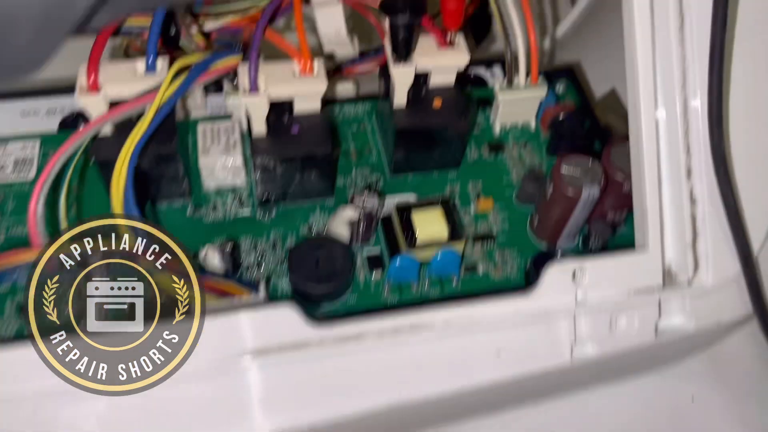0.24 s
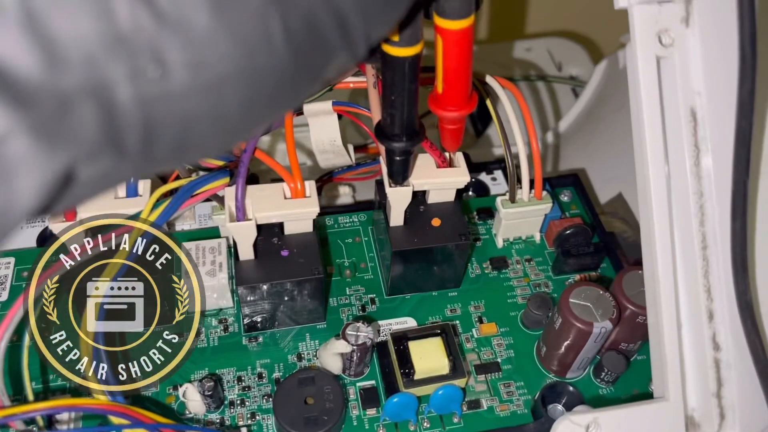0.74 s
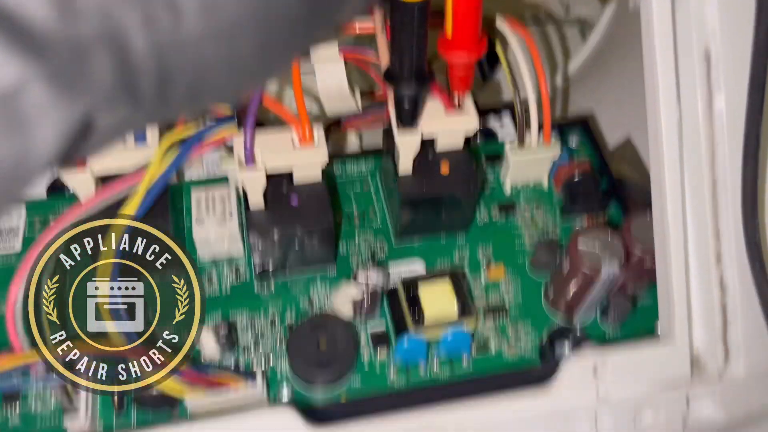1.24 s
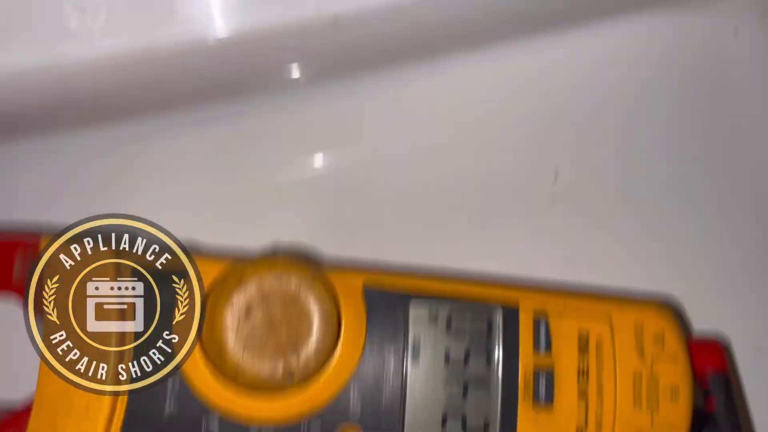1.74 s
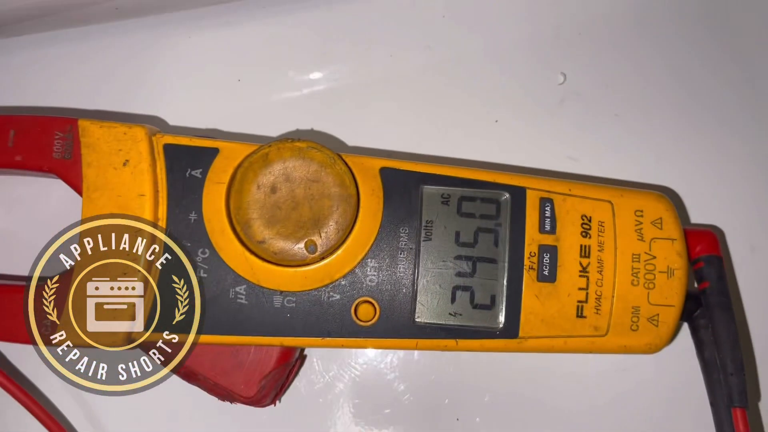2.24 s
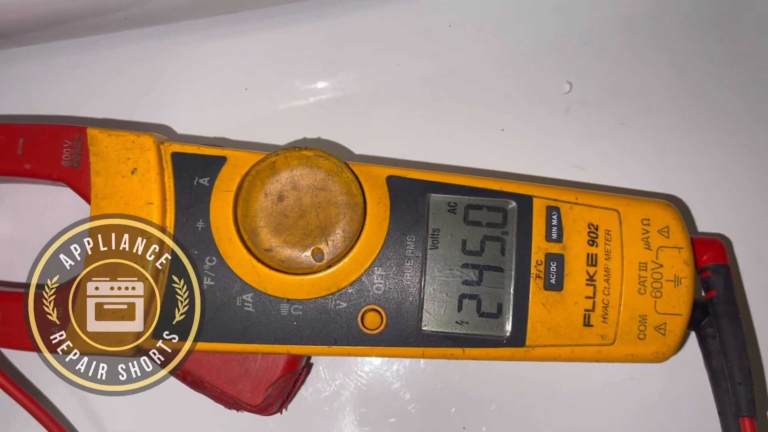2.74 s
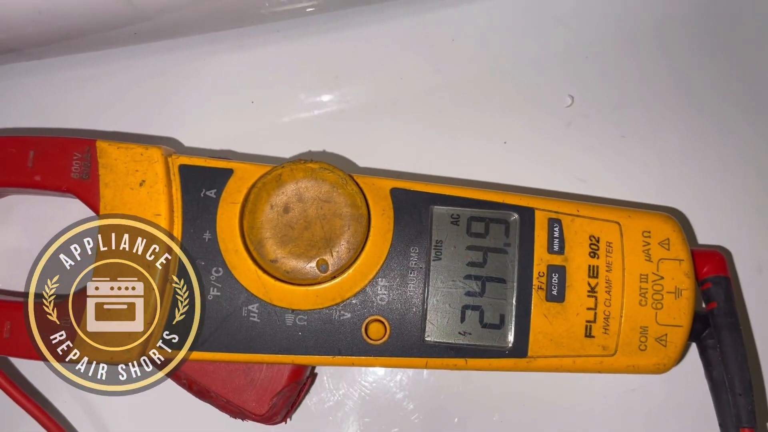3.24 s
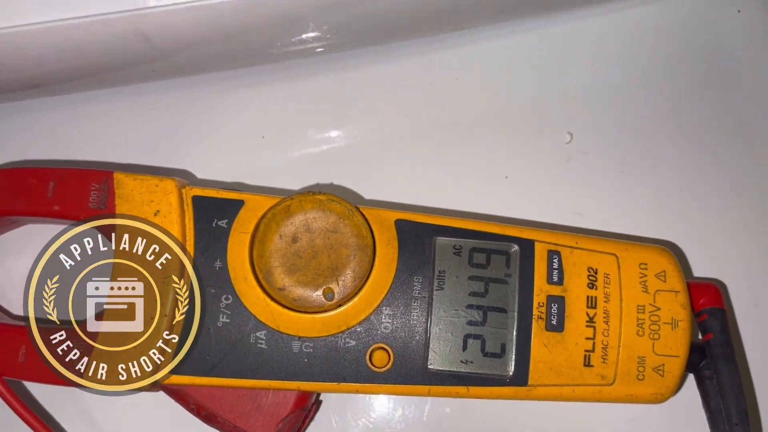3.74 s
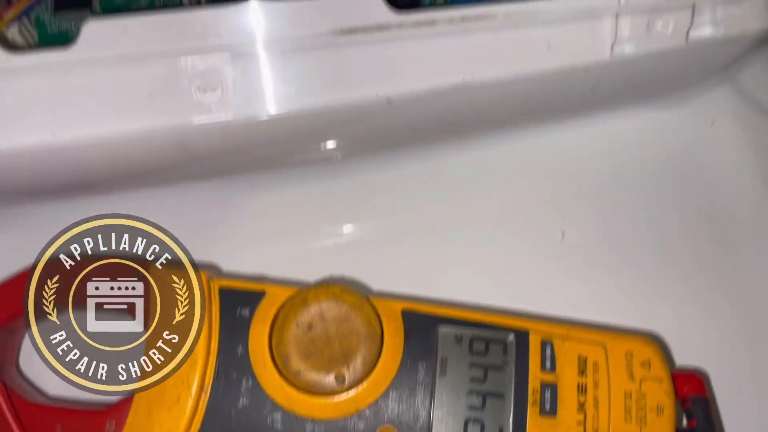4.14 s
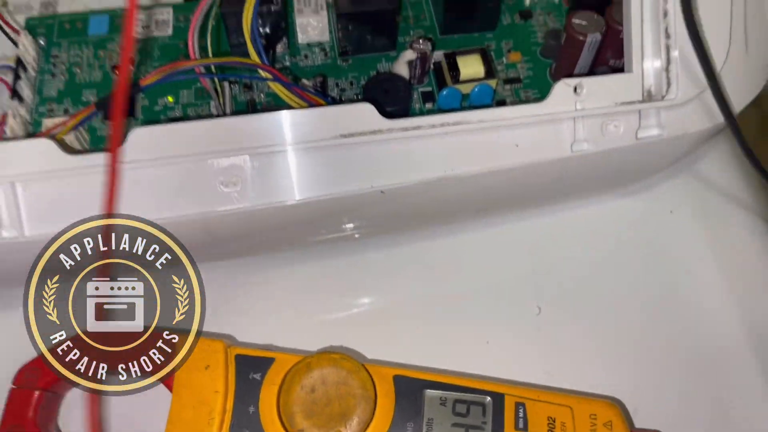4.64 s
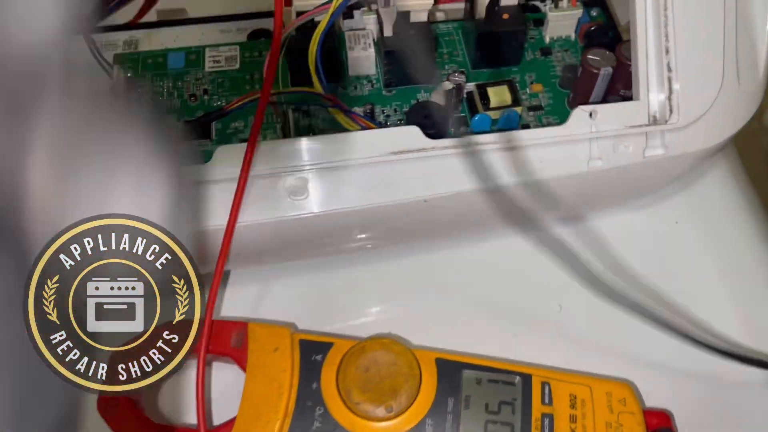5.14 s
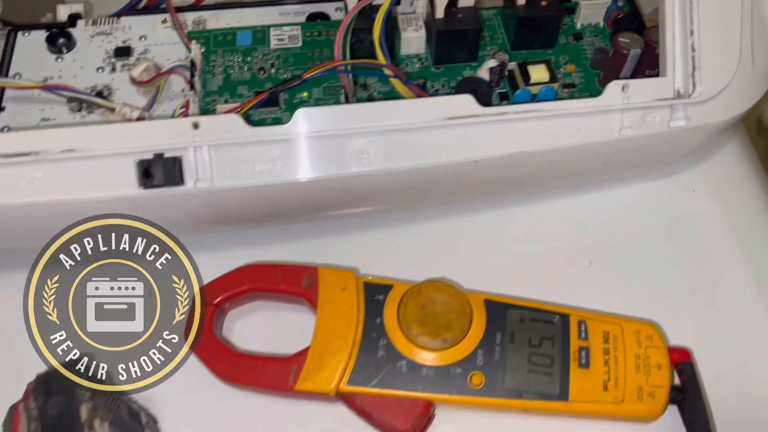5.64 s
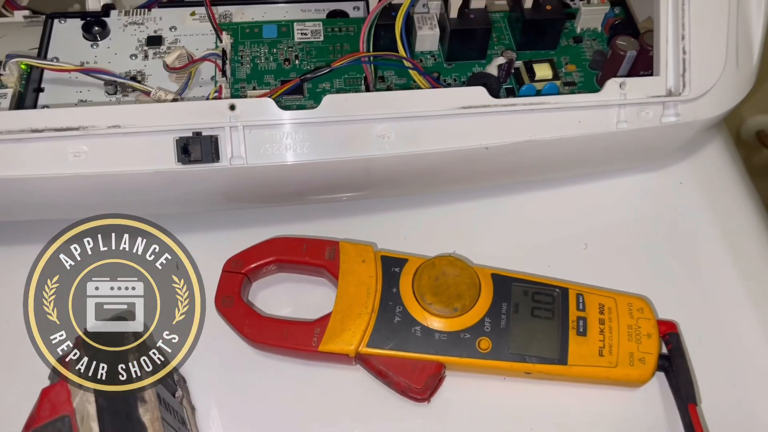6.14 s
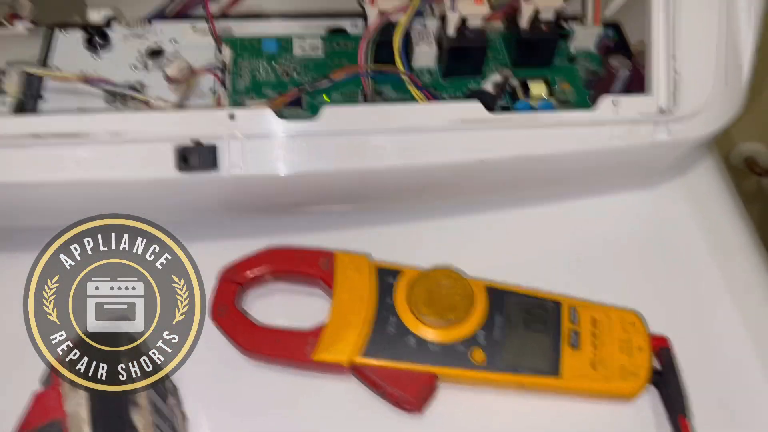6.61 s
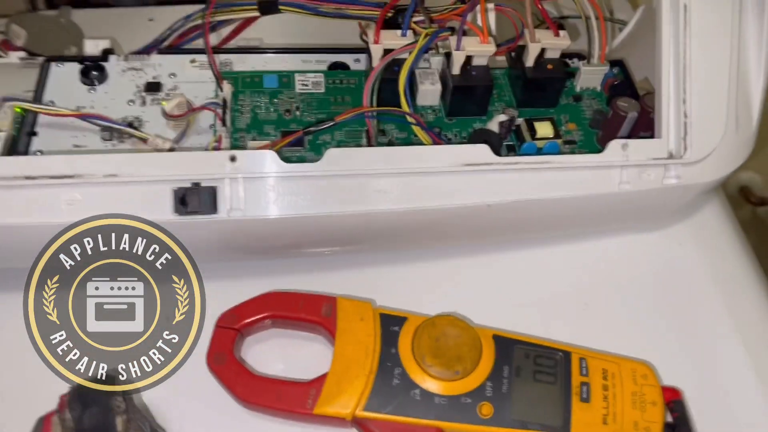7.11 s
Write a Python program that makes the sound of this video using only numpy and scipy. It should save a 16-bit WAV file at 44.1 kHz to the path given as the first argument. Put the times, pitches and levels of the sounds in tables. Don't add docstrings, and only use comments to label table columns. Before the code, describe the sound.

Close handheld pickup of a running clothes dryer, low mains hum and airy drum hiss, air buffeting, then plastic taps and a dragged lead.

```python
import sys
import numpy as np
from scipy import signal
from scipy.fft import rfft, irfft, next_fast_len
from scipy.io import wavfile
from scipy.ndimage import uniform_filter1d

SR = 44100
rng = np.random.default_rng(int(sys.argv[2]) if len(sys.argv) > 2 else 0)


def ratio_of_db(decibels):
    return 10 ** (np.asarray(decibels, float) / 20)


def bounce(signal):
    frames = np.transpose(np.atleast_2d(signal))
    limited = np.clip(frames, -1, 1)
    pcm = np.round(limited * 32767).astype(np.int16)
    wavfile.write(sys.argv[1], SR, pcm)


N = 325017

NEAR_DB = -35
DRUM_TURN_S = 1.214

# (time [s], base hum level [dB], how far the machine lies to one side [0-1])
POSE = [(0.0, -33.5, 0.22), (.5, -37, 0.03), (.95, -33.5, 0.03), (1.3, -35.5, 0), (1.5, -37, 0),
        (1.75, -33.5, 0), (2.4, -33.5, 0.01), (3.7, -34, 0), (4.2, -38, 0.5), (4.5, -36.5, 0.58),
        (4.8, -36.5, 0.1), (5.1, -38.5, 0.58), (5.6, -41.5, 0.68), (6.0, -39, 0.8), (6.3, -43.5, 0.72),
        (6.6, -40.5, 0.8), (7.0, -37.5, 0.49), (7.36, -37.5, 0.4)]
# (frequency [Hz], left lead [rad] and likeness [0-1] with the machine ahead,
# left lead [rad] and likeness [0-1] with it to one side)
PORTS = [(40, 0, 1, .7, .93), (150, 0, .998, .9, .9), (260, 0, .99, 1.6, .85), (420, .05, .94, 2.9, .75),
         (620, .15, .6, 3.4, .75), (800, -.3, .8, 4.2, .6), (1300, -.15, .85, 5.3, .5),
         (1900, .05, .94, 6.4, .8), (2800, 1.4, .4, 6.7, .35), (3900, 1.1, .45, 7.3, .45)]
# (time into the turn [s], level [dB], half width [s])
DRUM_RUB = [
    (1.205, -3, 0.097),
    (.14, 1, 0.029),
    (.29, -6, 0.049),
    (.48, 2, 0.016),
    (.64, 6.5, 0.0015),
    (.70, -5.5, 0.0091),
    (.84, -2, 0.012),
    (.96, 1.5, 0.085),
    (1.04, -1.5, 0.016),
]
# (time [s], level [dB], half width [s])
SHADE = [
    (1.3, -3, .03),
    (1.45, -2.5, .06),
    (4.2, -6, .05),
    (5.11, -4, .03),
    (6.26, -4, .025),
    (6.59, -6, .02),
    (6.71, -8, .035),
]


def evened(x):
    return x / np.sqrt(np.mean(np.abs(x) ** 2) + 1e-20)


def read(table, hz):
    f, *columns = np.transpose(table)
    return [np.interp(np.log(hz + 1), np.log(f + 1), c) for c in columns]


def curve(table, column, t):
    return np.interp(t, np.transpose(table)[0], np.transpose(table)[column])


def bumps(table, t, every_s=1e3):
    total = 0
    for s, db, width in table:
        apart = (t - s + every_s / 2) % every_s - every_s / 2
        total = total + db * np.exp(-.5 * (apart / width) ** 2)
    return total


def link(lead, likeness):
    return np.clip(likeness, 0, 1) * np.exp(1j * lead)


def pair(one, other, bond):
    unlike = np.sqrt(np.maximum(1 - np.abs(bond) ** 2, 0))
    return np.array([one, np.conj(bond) * one + unlike * other])


def port_table(hz):
    # (frequency [Hz], left lead [rad], likeness [0-1])
    treble_path = [(4400, 2.4, .7), (4750, 2.6, .75), (4900, 3.14, .96), (5050, 3.8, .78), (5400, 4.9, .8),
                   (5950, 6.28, .99), (7400, 7.8, .85), (8350, 9.0, .97), (9000, 9.42, .995),
                   (9650, 9.75, .98), (10600, 11.1, .92), (12000, 12.4, .98)]
    treble = [(f, lead, like, lead + 2 * np.pi, like) for f, lead, like in treble_path]
    return read(PORTS + treble, hz)


def machine_bond(hz, t):
    lead, like, side_lead, side_like = port_table(hz)
    aside = np.clip(curve(POSE, 2, t), 0, 1)
    return np.outer(link(lead, like), 1 - aside) + np.outer(link(side_lead, side_like), aside)


def airy(spectrum, level_db, bond_at, size, patchy_db, flicker_db):
    frames, hz = 4 * N // size + 5, np.fft.rfftfreq(size, 1 / SR)
    a, b, c, d, patches = rng.standard_normal((frames, len(hz), 5)).T
    patches = uniform_filter1d(patches, size=size // 100, axis=0)
    patches = evened(uniform_filter1d(patches, size=9, axis=1))
    flicker = evened(uniform_filter1d(rng.standard_normal(frames), size=5))
    z = pair(a + 1j * b, c + 1j * d, bond_at(hz, np.arange(frames) * size / 4 / SR))
    z = z * ratio_of_db(read(spectrum, hz)[0][:, None] + patchy_db * patches + flicker_db * flicker)
    sound = signal.istft(z, nperseg=size, noverlap=3 * size // 4)[1][:, :N]
    return evened(sound) * ratio_of_db(level_db)


def buffeting_db(t):
    # (time [s], buffeting level [dB])
    swings = [(0.0, -41.5), (.42, -43), (.55, -56.5), (1.2, -57), (1.28, -34), (1.54, -41.5), (1.65, -51),
              (2.3, -73), (3.8, -62), (3.88, -39), (4.0, -43.5), (4.2, -39), (4.35, -43), (5.0, -42.5),
              (5.9, -44.5), (6.45, -46), (6.6, -38.5), (7.37, -43)]
    # (time [s], level [dB], half width [s])
    gusts = [
        (.04, -1, 0.037),
        (4.55, 2, 0.05),
        (4.8, 1, 0.028),
        (5.15, 5, 0.027),
        (5.6, 15, 0.0092),
        (5.8, -0.5, 0.048),
        (6.26, 5.5, 0.059),
        (6.58, 3.5, 0.057),
        (6.71, -1, 0.053),
        (7.3, 1.5, 0.035),
    ]
    return curve(swings, 1, t) + bumps(gusts, t)


def swing(t):
    calm_db, full_db = -46, -36
    return np.clip((buffeting_db(t) - calm_db) / (full_db - calm_db), 0, 1.5)


def hum(waver_db=2.5):
    hum_hz, shaft_hz = 120.0, 29.2
    # (hum multiple, shaft multiple, level against the base [dB], left lead [rad])
    orders = [(0, 1, -34, .05), (0, 2, -13, .05), (1, -1, -18, .08), (2, -1, -30, 0), (2, 1, -18, -.3),
              (3, 0, -23.5, 0), (4, 1, -23, .85), (0, 19, -22.5, -.54), (5, 0, -24.5, -1.7),
              (5, 1, -29, .65)]
    # (multiple, level [dB], share of the base's change, gain in a full swing [dB], waver [dB])
    overtones = [(2, -40.3, .5, 2.0, .6), (4, -48.5, .5, -3.0, .8)]
    # (time [s], level [dB], half width [s])
    nodes_second = [
        (.75, -21, 0.045),
        (1.15, -7, 0.083),
        (2.0, -9, 0.028),
        (3.2, -38, 0.018),
        (3.52, -3.5, 0.12),
        (5.62, -3.5, 0.069),
        (5.95, -18, 0.022),
        (7.1, -7.5, 0.24),
    ]
    # (time [s], level [dB], half width [s])
    nodes_fourth = [
        (.75, 1.5, .25),
        (1.55, -3, 0.17),
        (2.9, -2, 0.065),
        (4.1, -3, 0.15),
        (4.75, 2.5, 0.81),
        (6.7, 6, .1),
        (7.1, 5, 0.049),
    ]
    # (time into the beat [s], level [dB], half width [s])
    beat, beat_s = [
        (.27, -11, .09),
        (.58, 3, .12),
    ], .625

    t = np.arange(N) / SR
    base, aside = curve(POSE, 1, t), curve(POSE, 2, t)
    lines = [(hum_hz, base, 0.8, .07)]
    for k, db, share, swing_db, waver in overtones:
        nodes = nodes_second if k == 2 else nodes_fourth
        level = db + share * (base - NEAR_DB) + swing_db * swing(t) + bumps(nodes, t)
        lines.append((round(k) * hum_hz, level, waver, 0))
    for m, s, db, own in orders:
        level = base + db
        if (m, s) == (0, 2):
            level = level + bumps(beat, t, beat_s)
        lines.append((m * hum_hz + s * shaft_hz, level, waver_db, own))

    out = np.zeros((2, N))
    for hz, db, waver, own in lines:
        start, slow = 2 * np.pi * rng.random(), rng.standard_normal(40)
        lead = (own + aside * (read(PORTS, hz)[2] - own)) * np.array([[.5], [-.5]])
        db = db + waver * np.interp(t, np.linspace(0, N / SR, len(slow)), slow)
        out += np.sqrt(2) * ratio_of_db(db) * np.sin(2 * np.pi * hz * t + start + lead)
    return out


def cabinet_rumble():
    # (frequency [Hz], density [dB per Hz])
    spectrum = [(22, -34), (36, -27), (52, 9), (70, -11.5), (100, 5.5), (150, -6.5), (210, -3.5),
                (265, 1.5), (315, -8.5), (410, -12), (560, -14), (900, -53)]
    panel_hz, panel_duck_db = 292, -3.5
    t = np.arange(N) / SR
    level = -37.5 + 0.23 * (curve(POSE, 1, t) - NEAR_DB) - 0.76 * swing(t)
    rumble = airy(spectrum, level, machine_bond, size=2048, patchy_db=-0.5, flicker_db=2.0)
    panels = signal.filtfilt(*signal.butter(2, panel_hz, "high", fs=SR), rumble)
    return rumble + panels * (ratio_of_db(panel_duck_db * swing(t) + 0.65 * bumps(SHADE, t)) - 1)


def blower_flow():
    # (frequency [Hz], density [dB per Hz])
    spectrum = [(250, -18), (400, -6), (600, -2), (720, 1), (880, 1), (1150, -5.5), (1350, -7), (1800, -19),
                (2600, -32)]
    # (time [s], level [dB], half width [s])
    over_panel = [
        (0.794, 2.5, 0.24),
    ]
    t = np.arange(N) / SR
    rub_db = bumps(DRUM_RUB, t, DRUM_TURN_S)
    level = -49 + 0.39 * (rub_db - rub_db.mean())
    level = level - 2.4 * np.maximum(buffeting_db(t) + 43.0, 0)
    level = level + bumps(SHADE + over_panel, t)
    return airy(spectrum, level, machine_bond, size=1024, patchy_db=2.0, flicker_db=1.24)


def drum_hiss():
    # (frequency [Hz], density [dB per Hz])
    spectrum = [(700, 2.5), (1300, 3), (1750, 1.5), (2350, 4.5), (3000, -1.5), (4000, -2), (4900, -2.5),
                (6500, -3), (8000, -1.5), (9000, -1), (10200, -.5), (11200, 1), (11750, -13), (12300, -23),
                (14000, -29)]
    t = np.arange(N) / SR
    level = -53 + bumps(DRUM_RUB, t, DRUM_TURN_S) + 0.3 * bumps(SHADE, t)
    return airy(spectrum, level, machine_bond, size=512, patchy_db=2.0, flicker_db=0.5)


def buffet_bond(hz, t):
    # (frequency [Hz], left lead [rad], likeness [0-1])
    push = [(61, 3.9, 0.22), (260, 2.85, 0.87), (352, 3.25, 1), (493, 3.48, 0.86), (797, 3.0, 0.86),
            (994, 3.14, 1), (1725, 4.37, 0.92), (2500, 3.5, 0.94)]
    return link(*read(push, hz))[:, None]


def moan_bond(hz, t):
    # (frequency [Hz], left lead [rad], likeness [0-1])
    boom = [(170, 2.7, .9), (250, 1.27, 0.86), (340, 2, 0.68)]
    return link(*read(boom, hz))[:, None]


def buffeting():
    # (frequency [Hz], density [dB per Hz])
    gust_spectrum = [(30, -30), (90, 0), (150, -1), (270, 0.5), (400, 1.5), (600, -4.5), (900, -7),
                     (1300, -14.5), (2000, -26.5), (4000, -40), (7000, -63)]
    # (frequency [Hz], density [dB per Hz])
    moan_spectrum = [(170, -39), (225, -24), (250, 17), (280, -14), (340, -40), (600, -80)]
    level = buffeting_db(np.arange(N) / SR)
    gusting = airy(gust_spectrum, level + 3.0, buffet_bond, size=1024, patchy_db=4.0, flicker_db=3.5)
    moan = airy(moan_spectrum, level - 2.5, moan_bond, size=2048, patchy_db=3.0, flicker_db=5.0)
    return gusting + moan


def touches():
    # (time [s], level [dB], centre [Hz], width [octaves], t60 [s])
    taps = [(4.334, -38.5, 2500, 0.48, 0.055), (4.335, -44, 6500, 1.2, 0.05), (4.454, -61, 1000, 1.2, .014),
            (4.482, -48, 7800, 0.49, 0.03), (4.719, -51, 5800, 2.1, 0.16), (4.8422, -34, 6600, 0.83, 0.008),
            (4.8422, -32, 2500, 7.3, 0.0083), (5.397, -46, 1500, 0.62, 0.09), (5.396, -47, 4970, 0.26, .03),
            (5.485, -46, 2030, 0.96, 0.03), (5.968, -44, 2760, 2.1, 0.2), (6.331, -54.5, 3000, 2.3, 0.39)]
    # (time [s], level [dB], centre [Hz], width [octaves], contact [s])
    brushes = [(4.269, -47, 2630, 0.16, 0.014), (4.272, -42, 7650, 0.65, 0.012),
               (4.276, -50, 1660, 0.12, 0.012), (4.277, -36, 11000, 0.18, 0.0084),
               (4.279, -50, 5550, 0.31, 0.01), (4.31, -48.5, 7000, 1.3, 0.024),
               (4.585, -57, 5500, 1.2, 0.024), (5.139, -52, 6400, 1.8, 0.031),
               (5.298, -48.5, 3000, 2.3, 0.024), (6.119, -49.5, 1410, 1.65, 0.024),
               (6.409, -47, 1027, 0.68, 0.037), (6.515, -50.5, 3540, 2.1, 0.016),
               (6.689, -52.5, 4000, 3.7, 0.025), (6.942, -56, 6140, 2.3, 0.046),
               (7.141, -50, 1810, 1, 0.02)]
    # (time [s], level [dB], pitch [Hz], contact [s])
    sings = [(4.275, -50, 7290, .012), (4.277, -49, 6150, .015), (4.276, -45, 11400, .012),
             (4.287, -49, 5600, .008), (5.514, -45, 1910, .012), (5.515, -52, 5780, .012),
             (5.516, -44, 3370, .012), (5.518, -45, 2980, .014), (5.543, -43, 2120, .02),
             (5.548, -50, 4140, .015), (5.55, -52, 5520, .015), (5.552, -42, 1200, .022),
             (5.584, -43, 2340, .025), (5.586, -44, 1990, .02), (5.592, -43, 1390, .025),
             (5.595, -41, 807, .03), (5.6, -44, 1170, .02), (5.615, -45, 1100, .015),
             (5.551, -52, 11500, .008)]
    tap_s, sing_width_hz, sing_t60_s = .0022, 110, 0.026
    rise_share = 0.33

    t, hz = np.arange(8192) / SR, np.fft.rfftfreq(8192, 1 / SR)
    rows = [(s, db, f, octaves, tap_s, tap_s, t60) for s, db, f, octaves, t60 in taps]
    for s, db, f, octaves, contact in brushes:
        t60 = 14.4 * contact * (3000 / f) ** 0.48
        rows.append((s, db, f, octaves, contact, rise_share * contact, t60))
    for s, db, f, contact in sings:
        rows.append((s, db, f, sing_width_hz / f, contact, rise_share * contact, sing_t60_s))

    out = np.zeros((2, N + 8192))
    for s, db, centre_hz, octaves, contact, rise, t60 in rows:
        colour = np.exp(-.5 * (2 * np.log2((hz + 1) / centre_hz) / octaves) ** 2)
        puff = evened(irfft(rfft(rng.standard_normal((2, len(t)))) * colour))
        shape = np.minimum(t / rise, 1) * ratio_of_db(-60 * np.maximum(t - contact, 0) / t60)
        out[:, round(s * SR):][:, :len(t)] += ratio_of_db(db) * puff * shape
    return out[:, :N]


def lid(x, ring_db):
    # (frequency [Hz], width [Hz], level [dB])
    modes = [(845, 74, 15), (1143, 48, 13.5), (1435, 290, 13.5), (2100, 250, 14), (2310, 21, -5),
             (3320, 24, -4), (4500, 9.5, -17), (5500, 59, 4)]
    t = np.arange(2048) / SR
    ring = sum(ratio_of_db(db) * np.exp(-np.pi * width * t) * np.sin(2 * np.pi * hz * t) for hz, width, db in modes)
    ring = ring[None] / np.linalg.norm(ring)
    return x + ratio_of_db(ring_db) * signal.oaconvolve(x, ring)[:, :x.shape[1]]


def clicks(table, low_hz):
    out = np.zeros((1, N))
    for s, db, edge_hz in table:
        band = signal.butter(2, [low_hz, edge_hz], "band", fs=SR)
        click = signal.lfilter(*band, signal.unit_impulse(256))
        out[0, round(s * SR):][:256] += ratio_of_db(db) * click / abs(click).max()
    return out


def tip_ticks():
    # (time [s], peak [dB], brightness edge [Hz])
    ticks = [
        (4.3143, -40, 5000),
        (4.3311, -23, 10000),
        (4.844, -31, 7000),
        (5.3955, -32, 4000),
        (5.4852, -40, 3000),
        (5.865, -38, 4020),
        (5.9695, -31, 7000),
        (6.24, -47, 4000),
        (6.3335, -35, 4900),
    ]
    return lid(clicks(ticks, low_hz=1000), ring_db=-2.0)


def pings(rise_s=0.001):
    # (time [s], peak [dB], pitch [Hz], t60 [s])
    rings = [(4.3300, -29, 2740, .017), (4.8420, -33, 5750, .008), (4.8425, -35, 1550, .012),
             (4.8434, -14.5, 8900, .005), (4.8435, -36, 860, .015), (5.3955, -35, 1500, .022),
             (4.7215, -42, 5750, .02), (5.4852, -35, 1800, .012), (5.9715, -44, 2950, .02),
             (5.969, -47, 3900, .02), (5.969, -49, 7200, .015), (5.969, -49, 5300, .02),
             (6.333, -48, 3900, .02), (6.333, -48, 2900, .02), (6.333, -44, 1400, .02)]
    out, t = np.zeros((1, N)), np.arange(4096) / SR
    for s, db, hz, t60 in rings:
        shape = np.minimum(t / rise_s, 1) * ratio_of_db(db - 60 * t / t60)
        out[0, round(s * SR):][:len(t)] += shape * np.sin(2 * np.pi * hz * t)
    return out


def grip():
    # (time [s], peak [dB], brightness edge [Hz])
    shifts = [
        (4.4072, -33, 4000),
        (4.4402, -39, 2500),
        (4.4545, -31, 1300),
    ]
    return clicks(shifts, low_hz=505) * np.array([[1], [-1]])


def clip_snap():
    # (time [s], peak [dB], brightness edge [Hz])
    snaps = [
        (4.8423, -27, 9000),
        (4.8429, -27, 10000),
        (4.844, -18, 11500),
        (4.8451, -23, 11000),
    ]
    return clicks(snaps, low_hz=7000)


def drag(slips_per_s=1200, spread_db=2.5, low_hz=450):
    # (time [s], level [dB])
    jerks = [(5.5125, -46), (5.516, -33), (5.524, -36), (5.535, -37), (5.553, -32.5), (5.58, -35),
             (5.597, -32.5), (5.612, -35), (5.628, -38), (5.638, -42), (5.66, -47), (5.7, -48)]
    t = np.arange(jerks[0][0], jerks[-1][0], 1 / SR)
    slips = rng.standard_normal((2, len(t))) * (0.35 + (rng.random(len(t)) < slips_per_s / SR))
    slips = slips * ratio_of_db(spread_db * rng.exponential(1, len(t)).clip(0, 3))
    hz, when, z = signal.stft(lid(slips, ring_db=-14.0), SR, nperseg=256, noverlap=192)
    hz = hz[:, None]
    edge_hz = 6100 * np.exp(-when / 0.18)
    tone = hz ** 2 / (hz ** 2 + low_hz ** 2) / (1 + (hz / edge_hz) ** 3)
    tone = tone / np.sqrt(np.mean(tone ** 2, 0))
    sound = evened(signal.istft(z * tone, SR, nperseg=256, noverlap=192)[1][:, :len(t)])
    out = np.zeros((2, N))
    out[:, round(t[0] * SR):][:, :len(t)] = sound * ratio_of_db(curve(jerks, 1, t))
    return out


def at_ports(two):
    # (frequency [Hz], share of the likeness [0-1])
    closeness = [(4000, 0.88), (7000, 0.95)]
    size = next_fast_len(N)
    one, other = rfft(two, size)
    hz = np.fft.rfftfreq(size, 1 / SR)
    bond = np.clip(read(closeness, hz)[0], 0, 1) * link(*port_table(hz)[2:])
    return irfft(pair(one, other, bond), size)[:, :N]


def scene():
    machine = (hum() + cabinet_rumble() + blower_flow()) * ratio_of_db(np.array([[.6], [-.6]]))
    air = buffeting() * ratio_of_db(np.array([[.7], [-.7]]))
    handling = at_ports(touches() + tip_ticks() + pings() + clip_snap() + drag()) + grip()
    return machine + drum_hiss() + air + handling


def band_limit(x):
    return signal.sosfilt(signal.butter(12, 16000, fs=SR, output="sos"), x)


def record(dry):
    edge_hz = 11560
    shelf = signal.firwin2(255, [0, edge_hz, edge_hz + 1200, SR / 2], [1, 1, ratio_of_db(-18.0), ratio_of_db(-24.0)], fs=SR)
    heard = signal.oaconvolve(dry, shelf[None], "same")
    return band_limit(heard)


dry = scene()
out = record(dry)
bounce(out)
```